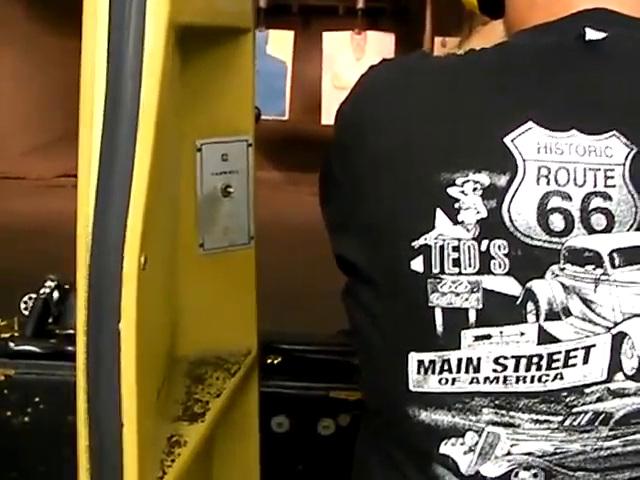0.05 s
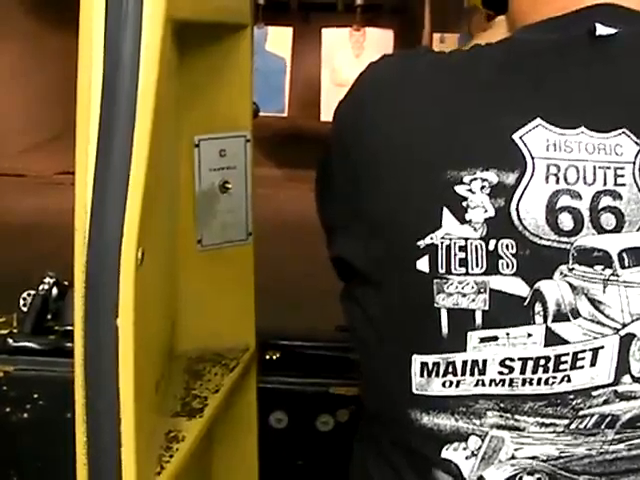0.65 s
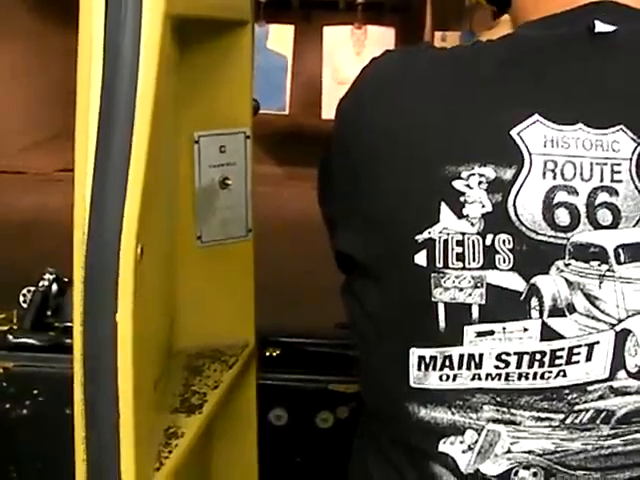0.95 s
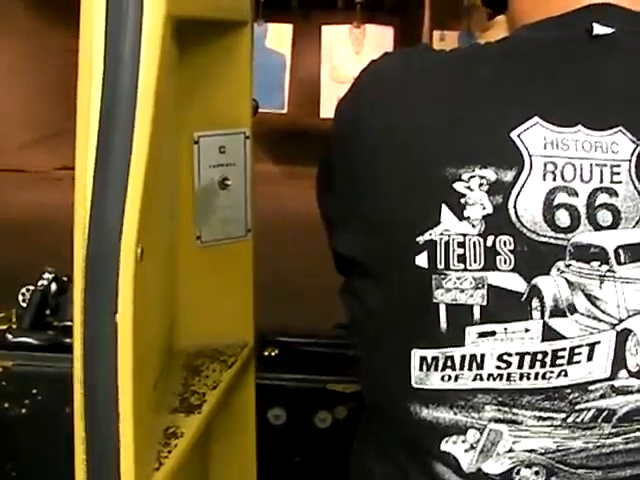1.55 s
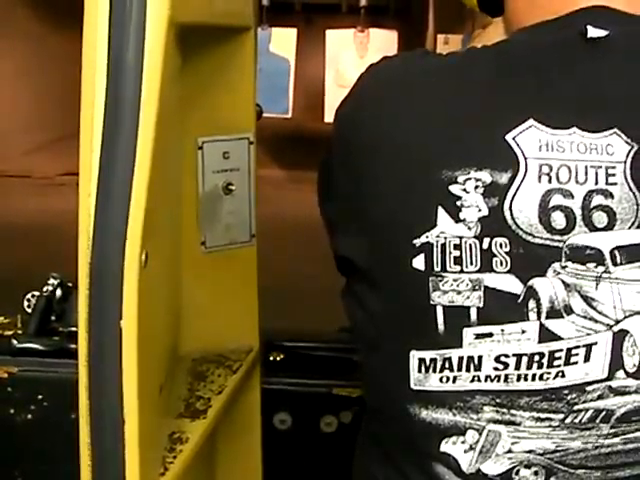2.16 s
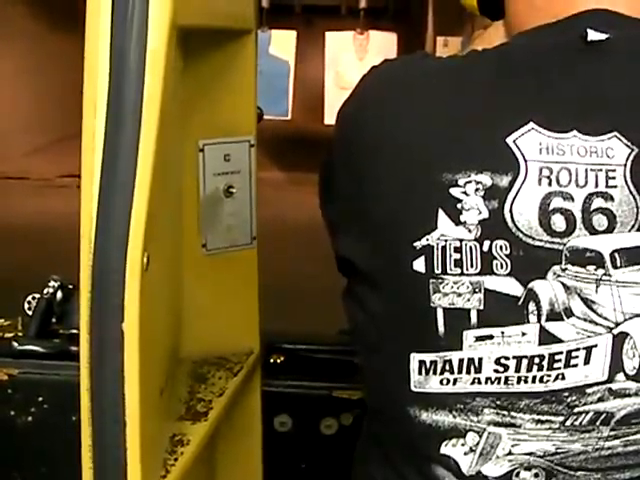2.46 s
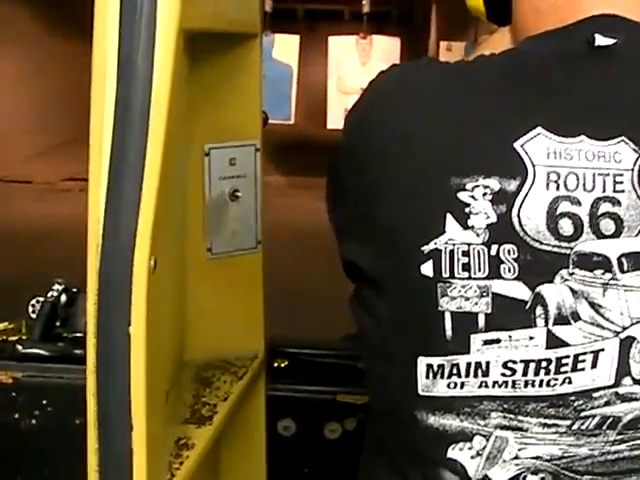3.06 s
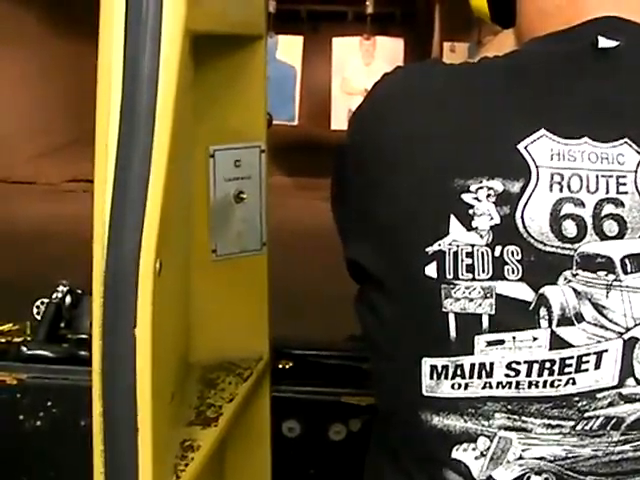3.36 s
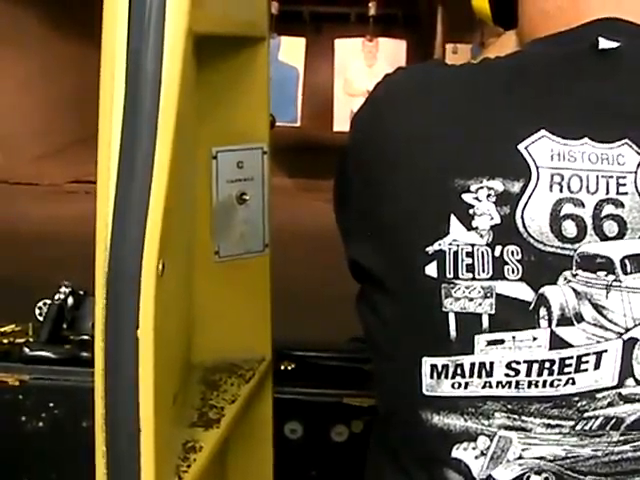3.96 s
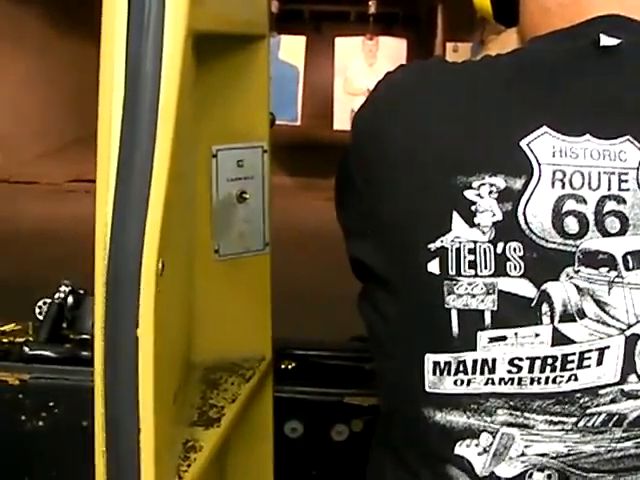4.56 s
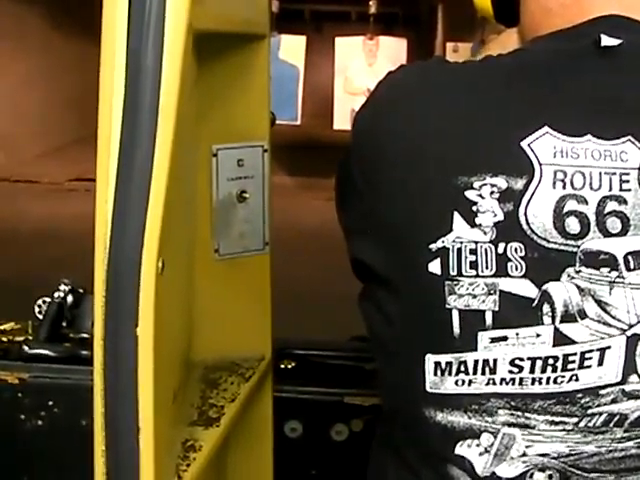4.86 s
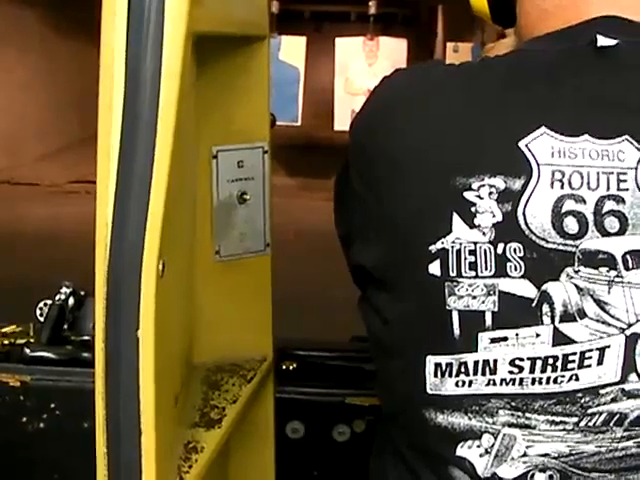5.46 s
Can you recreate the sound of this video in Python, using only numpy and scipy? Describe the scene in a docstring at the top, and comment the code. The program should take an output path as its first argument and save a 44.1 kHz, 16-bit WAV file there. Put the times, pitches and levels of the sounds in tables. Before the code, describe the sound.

A gunshot's tail rolls through an indoor range, a brass casing bounces and rings on concrete, then a second shot booms over roaring ventilation.

```python
"""An indoor shooting range: two gunshots, the first fired just before the scene opens. Each cracks, fills
the booth and rolls through the hall for seconds, fluttering between the side walls. The blast overloads
the microphones, and a limiter holds the loud part of the tail level. Brass casings bounce on the concrete
and ring as they spin, while the ventilation roars underneath."""
import sys
import numpy as np
from scipy import signal
from scipy.fft import rfft, irfft
from scipy.io import wavfile
from scipy.ndimage import uniform_filter1d, minimum_filter1d

SR = 44100
rng = np.random.default_rng(int(sys.argv[2]) if len(sys.argv) > 2 else 0)


def waveform_to_disk(signal):
    """Save audio, clipped to [-1, 1], as 16-bit WAV at the path in sys.argv[1]."""
    frames = np.transpose(np.atleast_2d(signal))
    scaled = np.clip(frames, -1, 1) * 32767
    samples = np.round(scaled).astype(np.int16)
    wavfile.write(sys.argv[1], SR, samples)


N = 251370

# stereo width of a diffuse field at the two microphones: freq_hz, side_minus_mid_db
STEREO_WIDTH = [(60, -21), (200, -23.5), (400, -22.5), (700, -19), (1280, -16.5), (2370, -9.5),
                (4370, -3.5), (8000, -1), (15000, -0.5)]
# low, middle and top mode of a brass casing: pitch_hz, t60_s
CASING_MODES = [(7260, 0.39), (10920, 0.31), (14550, 0.21)]


def gunshot(booth_db=23, booth_t60=0.33, crack_db=27, crack_t60=0.043, shadow_s=0.0026, shadow_db=-24):
    """A crack, weak while the shooter's body screens it, then booth and hall, swelling with each echo."""
    # the blast in the firing booth: freq_hz, density_db
    booth_colour = [(30, -63), (150, -3), (400, -16), (1300, 12.5), (3000, 3), (6000, -10.5), (12000, -21),
                    (16000, -46)]
    # echo clusters, probably off the ceiling baffles and the backstop: delay_s, width_s, boost_db
    echoes = [(0.052, 0.015, 2), (0.141, 0.044, 3.5)]
    # the bright crack: freq_hz, density_db
    crack_colour = [(60, -50), (300, -20), (1500, -11), (4000, 7.5), (7000, -8), (13000, -7), (17000, -33)]
    t = np.arange(3 * SR) / SR
    crack = amp(crack_db) * diffuse(crack_colour, len(t)) * fade(t, crack_t60)
    booth = amp(booth_db) * diffuse(booth_colour, len(t), wider_db=-1.0)
    booth *= fade(t, booth_t60) * rise(t, 0.0022)
    swell_db = sum(db * np.exp(-((t - delay) / width) ** 2) for delay, width, db in echoes)
    screened_db = shadow_db * np.clip(2 - 2 * t / shadow_s, 0, 1)
    return (crack + booth + hall_tail(t)) * amp(screened_db + swell_db) + wall_flutter(t)


def hall_tail(t, level_db=19.5, build_s=0.008):
    """Dense reverberation of the whole range, rolling unevenly."""
    # the blast filling the hall: freq_hz, density_db
    colour = [(30, -67), (90, -41), (170, -19.5), (330, -1.5), (520, 3.5), (850, 1.0), (1500, -5.5),
              (2700, -12.5), (4700, -17), (6800, -27), (11000, -30), (13300, -24.5), (15000, -63)]
    # decay of the hall: freq_hz, t60_s
    decay = [(100, 0.93), (400, 1.483), (800, 1.407), (1500, 1.514), (2700, 1.46), (4700, 1.27),
             (7000, 0.91), (11000, 0.73), (15000, 0.34)]
    return amp(level_db) * rise(t, build_s) * reverb_tail(colour, decay, len(t))


def wall_flutter(t, round_trip_hz=32.56, echo_db=2.0, echo_t60=2.21, modes_db=-4.5, modes_t60=2.26):
    """Sound trapped between the side walls repeats every round trip and outlasts the diffuse tail."""
    # the strongest standing waves between the side walls: pitch_hz, gain_db
    wall_modes = [(748, -6), (817, 1.5), (848, -4), (911, -6), (977, -4), (1010, -7), (1042, -3),
                  (1075, -7), (1203, -1), (1369, -7), (1403, -5), (1435, -2.5), (1565, -5), (1598, -6),
                  (1693, -5.5), (1726, -10), (1759, -4), (1792, -1), (1824, -2), (1922, -10), (1957, -6),
                  (1988, -8), (2084, -7), (2186, -7), (2218, -7), (2250, -11), (2309, -13), (2509, -13),
                  (2707, -12), (2772, -13), (2966, -7), (3002, -12), (3097, -13)]
    # colour of the weaker multiples of the round trip: freq_hz, gain_db
    colour = [(100, -74), (400, -42), (800, 14), (1800, 1), (2600, -3.5), (3400, -6), (5000, -31),
              (9000, -47)]
    period = round(SR / round_trip_hz)
    hz = np.fft.rfftfreq(period, 1 / SR)
    phase = 2 * np.pi * rng.random(len(hz))
    phase = phase + amp(curve(STEREO_WIDTH, hz)) * rng.standard_normal((2, len(hz)))
    trip = unit_rms(irfft(amp(curve(colour, hz)) * np.exp(1j * phase), period))
    echoes = amp(echo_db) * trip[:, np.arange(len(t)) % period] * fade(t, echo_t60)
    modes = sum(amp(modes_db + db) * stereo_mode(pitch, modes_t60, t) for pitch, db in wall_modes)
    return (echoes + modes) * rise(t, build_s=0.16)


def casing_bounce(t, spin_hz, tick_db, snap_db, bright_db, knock_db, knock_hz, clink_db, clink_hz,
                  *rings_db, snap_trim_db=-24.5, scatter_db=-18, clatter_db=-9):
    """Brass meets concrete: a tick, a snap and knock that scatter off the walls, a clink, then the ring."""
    # colour of the snap: freq_hz, density_db
    snap_colour = [(800, -30), (2500, 9.5), (3900, 9.5), (4800, 3.5), (6000, -1), (10000, -1.5),
                   (12300, -0.5), (13500, -6), (16000, -38)]
    # the treble that a sharp landing brightens: freq_hz, share_of_brightness
    treble_lift = [(9500, 0.099), (12300, 0.9)]
    # decay of small sounds around the firing line: freq_hz, t60_s
    room_decay = [(2000, 0.57), (5500, 0.55), (9000, 0.38), (14000, 0.39)]
    colour = [(hz, db + bright_db * curve(treble_lift, hz)) for hz, db in snap_colour]
    contact = amp(tick_db) * fade(t, t60=0.008) + amp(snap_db + snap_trim_db) * fade(t, t60=0.04)
    snap = contact * diffuse(colour, len(t))
    scatter = amp(snap_db + scatter_db) * reverb_tail(colour, room_decay, len(t))
    clatter = amp(clatter_db) * noise_band(knock_hz, 0.2, len(t)) * fade(t, t60=0.3) * rise(t, 0.008)
    knock = amp(knock_db) * (noise_band(knock_hz, 0.13, len(t)) * fade(t, t60=0.08) + clatter)
    clink = amp(clink_db) * noise_band(clink_hz, 0.055, len(t)) * fade(t, t60=0.36)
    ring = sum(amp(db) * spinning_ring(hz, t60, spin_hz, t) for (hz, t60), db in zip(CASING_MODES, rings_db))
    return snap + scatter + amp(tick_db) * landing_spike(t) + (knock + clink) * rise(t, 0.001) + ring


def landing_spike(t, gain_db=11, width_s=0.000075, delay_s=0.00036):
    """The single pressure spike of a casing hitting the floor."""
    u = (t - delay_s) / width_s
    return amp(gain_db) * (1 - u ** 2) * np.exp(-u ** 2 / 2)


def spinning_ring(hz, t60, spin_hz, t, pure=0.37, blurred=0.63, blur_s=0.00046, swing_s=0.0002, tumble=0.2):
    """One mode of a spinning casing: each turn swings pitch and level; the walls smear it into a band."""
    turn = 2 * np.pi * (spin_hz * t + rng.random())
    phase = 2 * np.pi * (hz * t + rng.random((2, 1))) + swing_s * hz * np.sin(turn)
    direct = np.sqrt(2) * np.sin(phase) * (1 + tumble * np.cos(2 * turn))
    smeared = noise_band(hz, blur_s * abs(spin_hz), len(t)) * rise(t, build_s=0.0086)
    return (pure * direct + blurred * smeared) * fade(t, t60)


def ring_swell(peak_s, width_s, *rings_db):
    """The ring of a slowly turning casing comes forward as a clean tone and sinks back."""
    t = np.arange(N) / SR
    tone = sum(amp(db) * stereo_mode(hz, np.inf, t) for (hz, _), db in zip(CASING_MODES, rings_db))
    return tone * np.exp(-((t - peak_s) / width_s) ** 2)


def far_ping(t, level_db, spin_hz=22.3):
    """A thin ping of spinning brass, like a second casing farther off."""
    # modes of the ping: pitch_hz, gain_db, t60_s
    modes = [(5000, 2, 0.33), (9700, -7, 0.4), (11800, 4.5, 0.35), (13350, -12, 0.3)]
    return sum(amp(level_db + db) * spinning_ring(hz, t60, spin_hz, t) for hz, db, t60 in modes)


def ventilation(roar_db=-30.0, drone_share=0.024, sizzle_share=0.072, flicker_db=3.0):
    """The steady roar of moving air and the drone of the fans, with a faint flickering sizzle on top."""
    # the moving air: freq_hz, density_db
    roar_colour = [(20, -39), (50, -25), (90, -14), (130, -3), (200, -0.5), (270, -4.5), (380, 0.4),
                   (560, -5), (1100, -10), (2200, -21), (4200, -29), (5800, -35.5), (10000, -46.5),
                   (13400, -46), (14200, -86)]
    # the fans droning in the ducts: pitch_hz, level_db
    fan_tones = [(125, -45.5), (181, -47.5), (237, -42.5), (350, -40.5), (482, -45), (508, -44),
                 (596, -44.5)]
    # bands of the sizzle: centre_hz, level_db
    sizzle_bands = [(6700, -65), (9600, -69.5), (10150, -66.5)]
    drone = sum(amp(db) * noise_band(hz, drone_share, N) for hz, db in fan_tones)
    sizzle = sum(amp(db + flicker_db * flicker()) * noise_band(hz, sizzle_share, N)
                 for hz, db in sizzle_bands)
    return amp(roar_db) * diffuse(roar_colour, N) + drone + sizzle


def flicker():
    """A random wobble of rms 1, swinging 3 to 11 times a second."""
    passband = abs(np.fft.rfftfreq(N, 1 / SR) - 7) < 4
    return unit_rms(irfft(rfft(rng.standard_normal(N)) * passband, N))


def reverb_tail(colour, decay, size, spread_s=0.28):
    """A diffuse tail: each band dies at its own speed and surges at random as the sound spreads out."""
    # random surges of the late tail: freq_hz, depth_db
    surge_depth = [(900, 2.0), (2500, 1.5)]
    hz, age, spectrum = signal.stft(diffuse(colour, size), SR, nperseg=512)
    patches = uniform_filter1d(rng.standard_normal(spectrum.shape[1:]), size=5, axis=0)
    patches = unit_rms(uniform_filter1d(patches, size=12, axis=1))
    surge_db = curve(surge_depth, hz)[:, None] * patches * np.minimum(age / spread_s, 1) ** 2
    spectrum = spectrum * amp(surge_db) * fade(age, curve(decay, hz)[:, None])
    return signal.istft(spectrum, SR, nperseg=512)[1][:, :size]


def diffuse(colour, size, wider_db=0):
    """Coloured stereo noise with a mid of rms 1, narrow in the bass and wide in the treble."""
    hz = np.fft.rfftfreq(size, 1 / SR)
    mid, side = rfft(rng.standard_normal((2, size))) * amp(curve(colour, hz))
    side_db = np.minimum(curve(STEREO_WIDTH, hz) + wider_db, 0)
    mid, side = irfft(mid, size), irfft(side * amp(side_db), size)
    return np.array([mid + side, mid - side]) / np.std(mid)


def noise_band(hz, share, size):
    """Narrow noise around hz; share is its half width as a part of hz."""
    # the band's shape: offset_half_widths, gain_db
    shape = [(-5, -100), (-1, -6), (0, 0), (1, -6), (5, -100)]
    return diffuse([(hz * (1 + offset * share), db) for offset, db in shape], size)


def stereo_mode(hz, t60, t):
    """One ringing mode; in the treble its phase differs more between the microphones."""
    apart = amp(curve(STEREO_WIDTH, hz)) * rng.choice([-1, 1]) * np.array([[1], [-1]])
    return np.sqrt(2) * np.sin(2 * np.pi * (hz * t + rng.random()) + apart) * fade(t, t60)


def rise(t, build_s):
    """A soft attack with time constant build_s."""
    return 1 - np.exp(-t / build_s)


def fade(t, t60):
    """Falls by 60 dB in t60 seconds."""
    return np.exp(-np.log(1000) * t / t60)


def amp(db):
    return 10 ** (np.asarray(db) / 20)


def unit_rms(x):
    return x / np.sqrt(np.mean(x ** 2) + 1e-20)


def curve(points, hz):
    """A table joined by straight lines on a log-frequency axis."""
    freqs, values = np.transpose(points)
    return np.interp(np.log(hz + 1), np.log(freqs + 1), values)


def add(mix, start_s, sound):
    """Mixes a stereo sound in at start_s, which may lie before the scene opens."""
    at = round(start_s * SR)
    sound = sound[:, max(-at, 0):]
    part = mix[:, max(at, 0):][:, :sound.shape[1]]
    part += sound[:, :part.shape[1]]


def scene():
    """Shots and casings over the ventilation."""
    # the two shots: start_s, gain_db
    shots = [(-0.29, 0.45), (5.051, 0.54)]
    # casings landing: start_s, spin_hz, tick_db, snap_db, bright_db, knock_db, knock_hz,
    # clink_db, clink_hz, low_ring_db, middle_ring_db, top_ring_db
    bounces = [(0.495, 30, -27, -21, 2, -42, 3800, -47, 3800, -26.5, -33.5, -62),
               (0.6999, 47, -5, 0.5, -4.5, -10, 3350, -23, 3700, -15.5, -16.5, -19),
               (0.9171, 28, -42, -13.5, 9, -24, 3950, -36, 3950, -26.5, -28.5, -57),
               (1.1358, 19, -30, -18.5, 14, -37, 4430, -46, 4330, -27.5, -32.5, -40),
               (1.2779, 13, -24, -20.5, 13, -27.5, 3760, -37, 4200, -35.5, -30, -60),
               (1.4070, 20, -48, -26, 2, -28.5, 4600, -36, 4400, -34, -49, -51),
               (1.543, 8, -62, -39, 0, -35, 4500, -41, 4450, -43, -63, -82),
               (1.5763, 9.9, -58, -44, -2, -36, 4540, -41, 4420, -56, -68, -82),
               (1.615, 8, -68, -55, 0, -50, 4250, -45, 4200, -56, -69, -82),
               (5.477, 32, -17, -14, 11, -30, 3800, -36, 3800, -26, -36, -60)]
    # the ring swells, probably as the casing's mouth turns this way:
    # peak_s, width_s, low_ring_db, middle_ring_db
    swells = [(1.159, 0.0072, -24, -50), (1.375, 0.03, -50, -62), (1.513, 0.026, -34, -44),
              (1.675, 0.018, -46, -66), (1.718, 0.02, -52, -54)]
    # thin, distant pings: start_s, level_db
    pings = [(0.515, -44), (0.655, -47), (1.050, -44.5)]
    mix = ventilation()
    for start_s, gain_db in shots:
        add(mix, start_s, amp(gain_db) * gunshot())
    t = np.arange(2 ** 15) / SR
    for start_s, *landing in bounces:
        add(mix, start_s, casing_bounce(t, *landing))
    mix += sum(ring_swell(*swell) for swell in swells)
    for start_s, level_db in pings:
        add(mix, start_s, far_ping(t, level_db))
    return mix


def limiter(x, threshold_db=-9.0, deepest_db=26, treble_weight=2.73,
            attack_s=0.00075, hold_s=0.0048, release_db_per_s=95):
    """Ducks fast, above all on treble, holds, then recovers; its range is too small for the blast."""
    sidechain = x + treble_weight * np.diff(x, prepend=0)
    power = uniform_filter1d((sidechain ** 2).mean(0), size=100)
    over_db = np.clip(10 * np.log10(abs(power) + 1e-12) - threshold_db, 0, deepest_db)
    hold = round(hold_s * SR)
    held_db = -minimum_filter1d(-over_db, hold, origin=(hold - 1) // 2)
    recovery_db = np.arange(N) * release_db_per_s / SR
    cut_db = np.maximum.accumulate(held_db + recovery_db) - recovery_db
    pole = np.exp(-1 / (attack_s * SR))
    smooth_cut_db = signal.lfilter([1 - pole], [1, -pole], cut_db, zi=[pole * cut_db[0]])[0]
    return x * amp(-smooth_cut_db)


def record(dry, notch_hz=8000, notch_width_hz=1050, balance_db=0.2, ceiling=0.99,
           low_cut_hz=70, high_cut_hz=15500):
    """The microphone chain: limiter, a narrow treble notch, overload, low cut and high cut."""
    x = limiter(dry) * amp([[balance_db], [-balance_db]])
    notch_edges = [notch_hz - notch_width_hz / 2, notch_hz + notch_width_hz / 2]
    x = signal.sosfilt(signal.butter(3, notch_edges, "bandstop", fs=SR, output="sos"), x)
    x = x / (1 + (x / ceiling) ** 8) ** (1 / 8)  # overload rounds off the peaks
    x = signal.sosfilt(signal.butter(1, low_cut_hz, "highpass", fs=SR, output="sos"), x)
    high_cut = signal.firwin(255, high_cut_hz, window=("kaiser", 8), fs=SR)
    return signal.oaconvolve(x, high_cut[None], "same")


dry = scene()
out = record(dry)
waveform_to_disk(out)
```